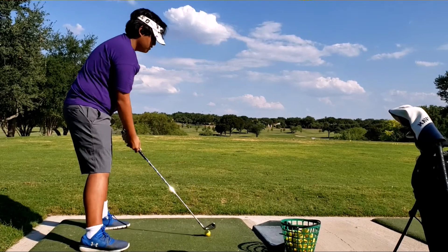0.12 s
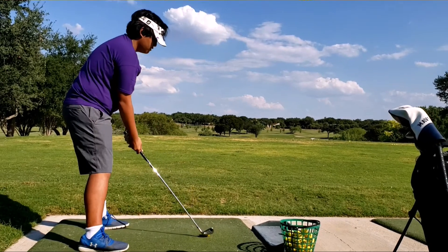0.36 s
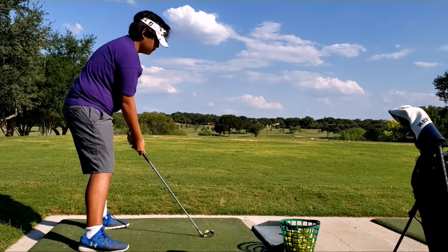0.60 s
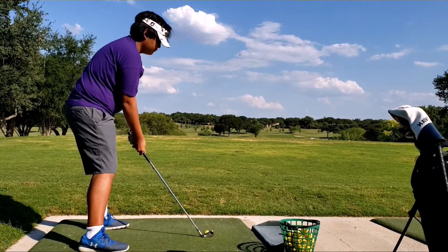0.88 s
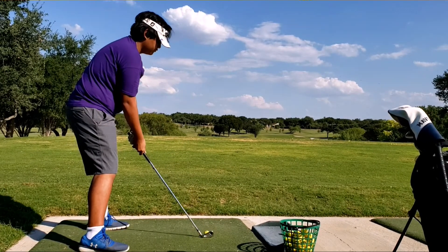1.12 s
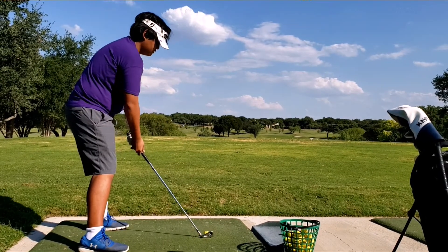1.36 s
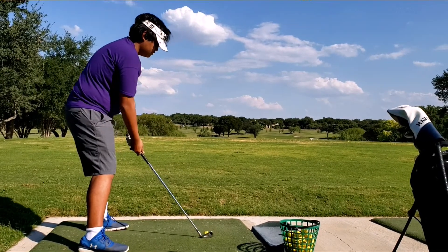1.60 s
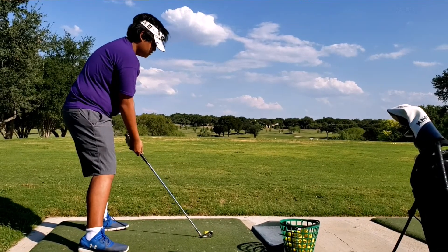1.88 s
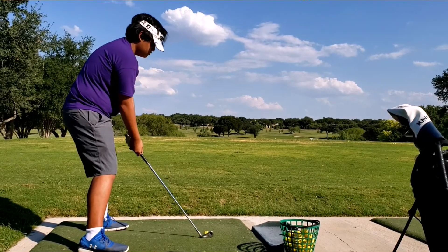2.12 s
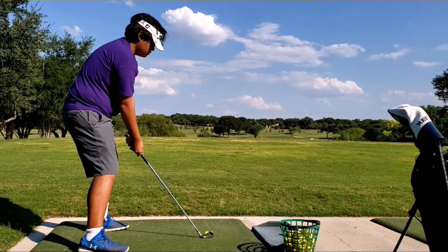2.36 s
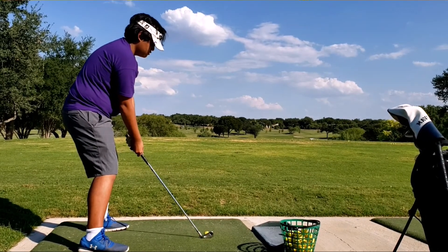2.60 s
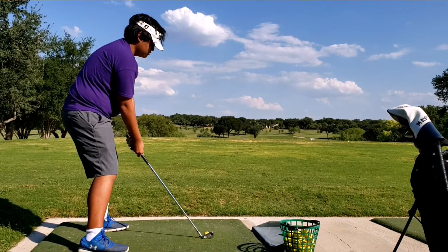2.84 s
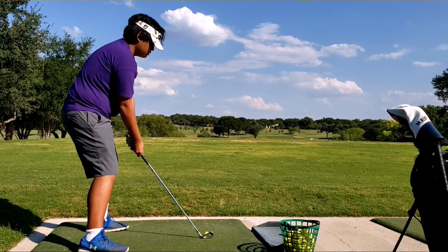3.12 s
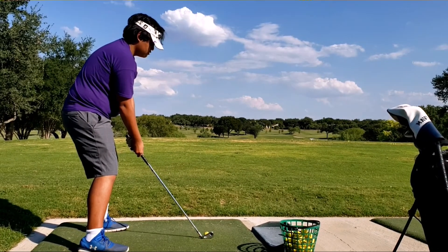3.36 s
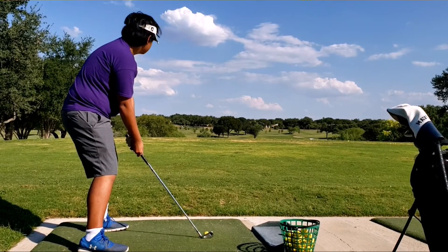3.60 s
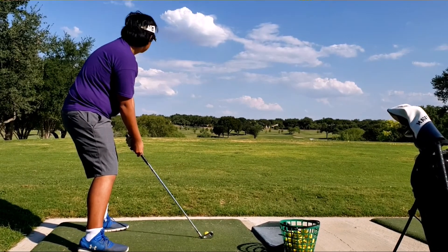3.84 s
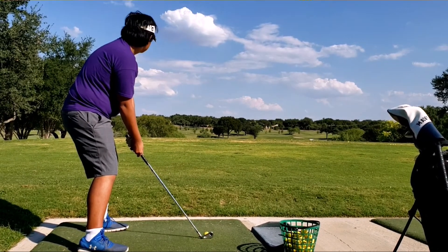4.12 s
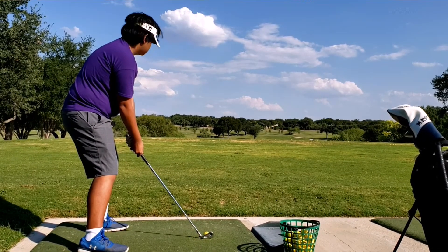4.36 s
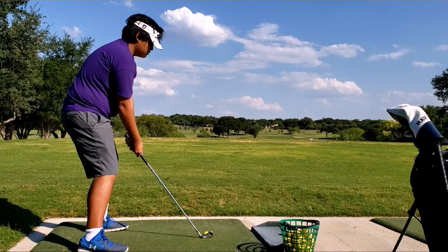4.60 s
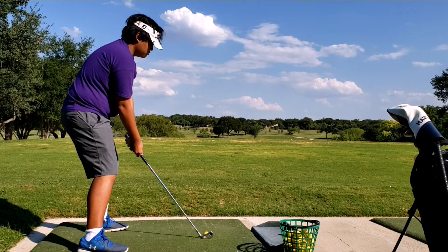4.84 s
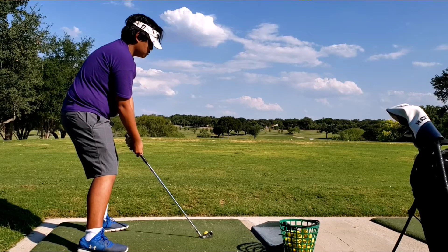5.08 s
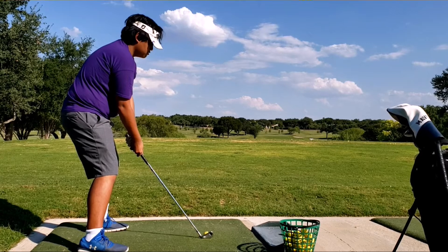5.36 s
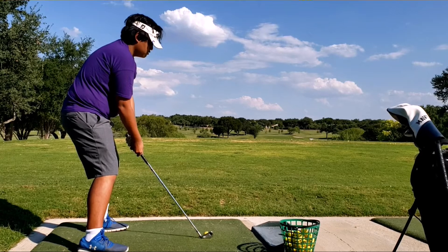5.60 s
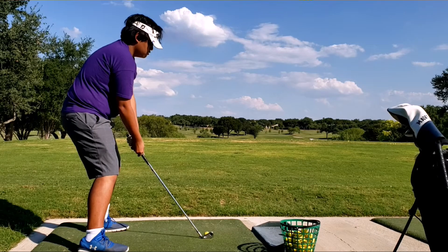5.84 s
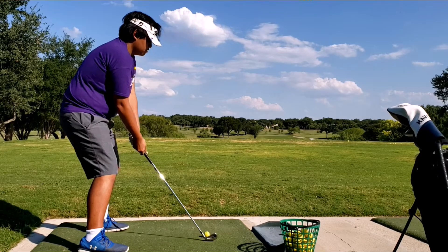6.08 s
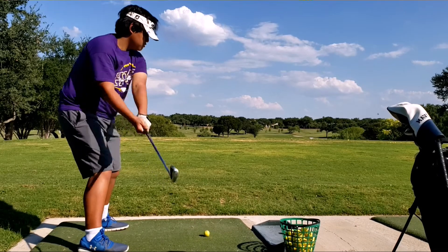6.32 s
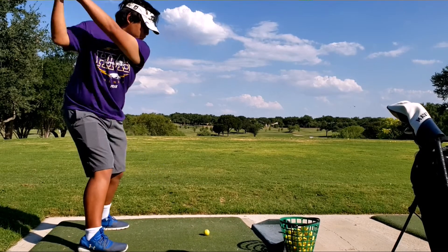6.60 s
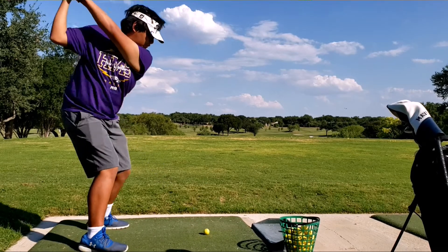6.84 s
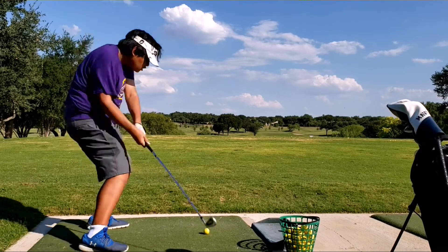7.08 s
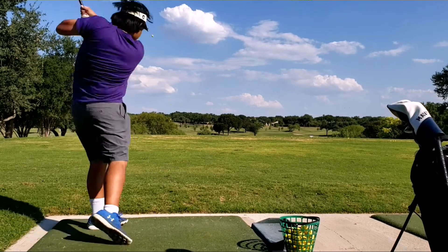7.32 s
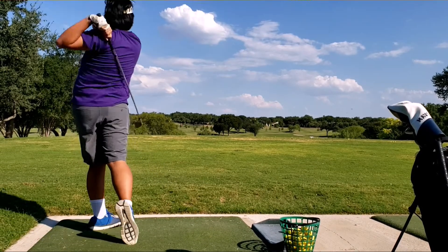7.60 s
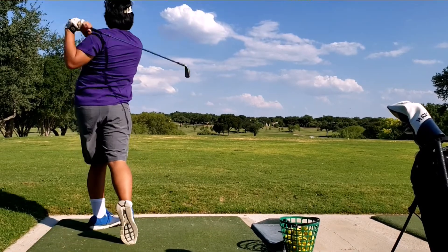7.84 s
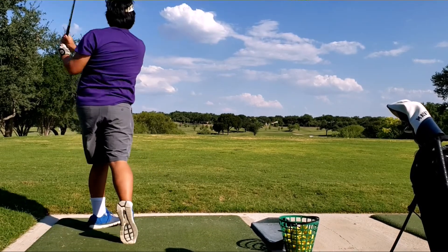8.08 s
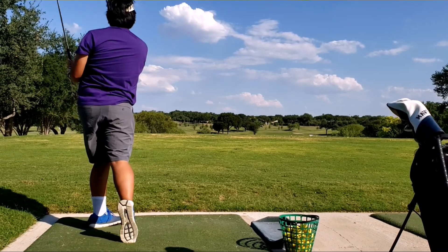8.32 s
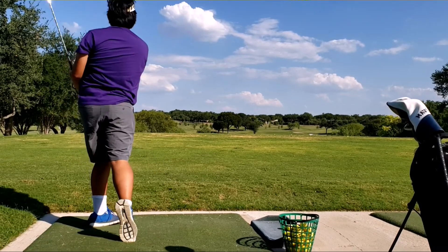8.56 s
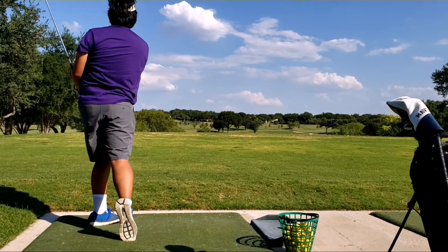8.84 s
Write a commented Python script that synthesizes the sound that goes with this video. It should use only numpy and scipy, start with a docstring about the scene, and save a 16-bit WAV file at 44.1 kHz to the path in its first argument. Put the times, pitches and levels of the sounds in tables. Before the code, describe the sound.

Outdoor range: quiet rumble, thin hiss and tiny metallic knocks; a distant shot echoes, then a close iron swishes and cracks a ball away.

```python
"""A machine drones far off over traffic rumble and thinning hiss; clubs and balls clink, a neighbour hits a shot.
Then cloth rustles, an iron hisses down, grazes a range mat and cracks a ball away near a stereo phone.
Drone and whistle are wandering sines; rumble, hiss, scrape and wake are coloured noise.
Clinks, mat, club face and shaft are decaying modes with noise; a neighbour's crack trails echoes.
A single pop is a jump in the signal."""
import sys
import numpy as np
from scipy import signal
from scipy.fft import rfft, irfft, next_fast_len
from scipy.io import wavfile
from scipy.ndimage import uniform_filter1d

SR = 44100
rng = np.random.default_rng(int(sys.argv[2]) if len(sys.argv) > 2 else 0)


def convert_level_to_amplitude(level_db):
    """Map a level in decibels to its linear amplitude factor."""
    exponent = np.asarray(level_db, float) / 20
    return 10 ** exponent


def generate_wav(signal):
    """Clip the signal to [-1, 1] and save it as 16-bit WAV at the path in sys.argv[1]."""
    frames = np.transpose(np.atleast_2d(signal))
    scaled = np.clip(frames, -1, 1) * 32767
    pcm = np.round(scaled).astype(np.int16)
    wavfile.write(sys.argv[1], SR, pcm)


N = 394694
TIME = np.arange(N) / SR
LEFT_LAG_S = 0.00016  # the far sounds reach the right port first

# port balance of far noise: f/Hz, left minus right/dB
PORTS = [(60, 2), (110, 1.5), (200, 3), (380, 1.5), (700, 9.5), (1290, 6), (2380, 3.5), (4400, 0.5),
         (8120, 11.5), (15000, -5)]
# club contacts (sole on mat twice, face on ball, mat rebounds):
# t/s, level/dB, push width (4 sigma)/ms, face ring re mat thud/dB
BLOWS = [(7.2514, -19.5, 1, -28.5), (7.2531, -20, 0.9, -25), (7.2542, -18.5, 0.086, 20),
         (7.2551, -10.5, 0.055, -17), (7.2581, -12.5, 1, -17), (7.2609, -17, 0.88, -19)]
IMPACT_S = BLOWS[2][0]  # face meets ball


def shape(x, points, lead=((1, 0), (2, 0))):
    """Filter by gain points (f/Hz, dB) and phase points (f/Hz, rad)."""
    size = next_fast_len(x.shape[-1], True)
    hz = np.maximum(np.fft.rfftfreq(size, 1 / SR), 1)
    at, db = np.transpose(points)
    gain = convert_level_to_amplitude(np.interp(np.log(hz), np.log(at), db))
    turn = np.exp(1j * np.interp(hz, *np.transpose(lead)))
    return irfft(rfft(x, size) * gain * turn, size)[..., :x.shape[-1]]


def unit(x):
    """Scale to rms 1."""
    return x / np.sqrt(np.mean(x ** 2))


def band(x, lo_hz, hi_hz, order=2):
    """Butterworth band-pass."""
    sos = signal.butter(order, [lo_hz, hi_hz], "band", fs=SR, output="sos")
    return signal.sosfilt(sos, x)


def fade(t, t60):
    """Silent before 0, then exponential decay, 60 dB in t60 seconds."""
    return (t >= 0) * np.exp(-np.log(1000) * np.maximum(t, 0) / t60)


def walk(rate, size=N):
    """Slow random signal of rms 1: held noise at rate Hz, smoothed twice."""
    k = int(SR / rate)
    held = np.repeat(rng.standard_normal(size // k + 1), k)
    return unit(uniform_filter1d(uniform_filter1d(held, k), k)[:size])


def pan(db):
    """Left and right gains for a left minus right level in dB."""
    return convert_level_to_amplitude(np.array([db / 2, -db / 2]))


def sides(x, points, lead=((1, 0), (2, 0))):
    """Each microphone port colours the sound its own way; the left is also phase-shifted by lead."""
    at, db = np.transpose(points)
    return np.array([shape(x[0], np.c_[at, db / 2], lead), shape(x[1], np.c_[at, -db / 2])])


def add(out, s, x):
    """Mix x into out at s seconds."""
    i = int(round(s * SR))
    out[:, i:i + x.shape[1]] += x[:, :N - i]


def modes(t, table):
    """Sum of decaying sines (f/Hz, level/dB, t60/s)."""
    return sum(convert_level_to_amplitude(db) * fade(t, t60) * np.sin(2 * np.pi * hz * t) for hz, db, t60 in table)


def patchy(x, db, rate):
    """Third-octave bands flicker independently by db rms at rate Hz."""
    size = x.shape[-1]
    spec = rfft(x)
    at = 3 * np.log2(np.maximum(np.fft.rfftfreq(size, 1 / SR), 350) / 350)
    out = 0
    for k in range(19):
        part = irfft(spec * np.maximum(1 - abs(at - k), 0), size)
        out = out + part * convert_level_to_amplitude(db * walk(rate, size=size))
    return out


def drone():
    """A steady far machine: one strong low tone whose partials waver on the wind."""
    # fundamental: t/s, level/dB
    drone_level = [(0.0, -34), (0.05, -35.5), (1.32, -36), (1.62, -44.5), (3.69, -34.5), (4.01, -38.5),
                   (4.29, -32), (4.59, -36.5), (4.69, -44.5), (5.06, -33), (5.63, -39), (5.71, -47),
                   (6.33, -39.5), (6.86, -44), (6.9, -53.5), (7.3, -35.5), (7.85, -50), (8.2, -32.5),
                   (8.45, -39.5), (8.95, -37)]
    # other partials: multiple of the pitch, level/dB, waver/dB
    partials = [(0.616, -64.5, 2.5), (1.251, -47, 2), (2.017, -50.5, 2), (3.022, -57, 5.5), (3.998, -58, 4),
                (5.064, -64, 5), (10.37, -69, 3), (23.77, -90, 4), (23.9, -88.5, 4)]
    pitch_hz, pitch_stray_hz = 57.3, 0.297
    partial_stray_rad = 0.06  # per multiple: high partials blur
    phase = 2 * np.pi * np.cumsum(pitch_hz + pitch_stray_hz * walk(2)) / SR
    out = convert_level_to_amplitude(np.interp(TIME, *np.transpose(drone_level)) + 1.5 * walk(7)) * np.sin(phase)
    for k, order_db, waver_db in partials:
        strayed = phase + partial_stray_rad * walk(60)
        tone = np.sin(k * strayed + 2 * np.pi * rng.random())
        out = out + convert_level_to_amplitude(order_db + waver_db * walk(8)) * tone
    late = np.roll(out, int(LEFT_LAG_S * SR))
    return np.sqrt(2) * np.array([late, out]) * pan(2.3)[:, None]


def background():
    """Noise: traffic rumble alike in both ports, roar less so; hiss that slowly thins below 8 kHz."""
    # likeness of the ports: f/Hz, likeness -1..1 (clipped)
    likeness = [(60, 0.9), (130, 1), (290, 0.9), (640, 0.65), (1410, -0.23), (3100, -1.3), (6820, 0.19),
                (15000, 0.24)]
    # traffic before the offsets below: t/s, low rumble/dB, roar/dB
    traffic = [(0, -42, -58), (1.9, -45, -57.5), (4.3, -43, -58.5), (7.2, -44, -57), (7.8, -45, -59.5),
               (8.95, -44.5, -60)]
    # traffic colour: f/Hz, relative gain/dB
    rumble_colour = [(15, -65.5), (25, -33), (29, -20.5), (36, -16.5), (63, -7), (87, -5), (123, -8),
                     (175, -11), (195, -14), (281, -17), (384, -30), (413, -29), (596, -32), (1130, -49),
                     (2000, -65), (2600, -92), (4400, -120)]
    # hiss colour: f/Hz, relative gain/dB
    hiss_colour = [(880, -33), (1500, 2), (1830, -3), (2280, -3), (2460, -4), (2760, -2.5), (3130, -7.5),
                   (4210, -8), (4900, -8), (6650, -11.5), (8610, -30), (9470, -22), (10700, -12.5),
                   (13900, -11.5), (14700, -17.5)]
    # hiss below about 8 kHz: t/s, level/dB
    low_hiss_level = [(0, -76.5), (3, -79.5), (6.4, -79.5), (6.9, -80.5), (7.8, -82.5), (8.95, -84)]
    top_hiss_db = -75.5
    at, alike = np.transpose(likeness)
    alike = np.clip(alike, -.999, .999)
    mid = shape(rng.standard_normal(N), np.c_[at, 10 * np.log10(1 + alike)])
    side = shape(rng.standard_normal(N), np.c_[at, 10 * np.log10(1 - alike)])
    lag = [(0, 0), (SR / 2, -np.pi * SR * LEFT_LAG_S)]
    far_noise = shape(sides(np.array([mid + side, mid - side]), PORTS, lag), rumble_colour)
    low = shape(far_noise, [(330, 0), (420, -62.5)])
    roar = far_noise - low
    hiss = shape(sides(rng.standard_normal((2, N)), PORTS), hiss_colour)
    low_hiss = shape(hiss, [(7000, -1.5), (9500, -61.0)])
    s, low_db, roar_db = np.transpose(traffic)
    low_gain = convert_level_to_amplitude(np.interp(TIME, s, low_db) + 4.0 + 1.0 * walk(6))
    roar_gain = convert_level_to_amplitude(np.interp(TIME, s, roar_db) + 1.5 + 1.7 * walk(6))
    waver_db = 1.0 * np.array([walk(9.6), walk(13)])
    low_hiss_gain = convert_level_to_amplitude(np.interp(TIME, *np.transpose(low_hiss_level)) + waver_db)
    top_hiss_gain = convert_level_to_amplitude(top_hiss_db + 1.1 * walk(34))
    return (low_gain * unit(low) + roar_gain * unit(roar)
            + low_hiss_gain * unit(low_hiss) + top_hiss_gain * unit(hiss - low_hiss))


def thud_and_ring(t):
    """Modes of the mat, and of club face and ball; the ball flattens before it springs."""
    # mat: f/Hz, level/dB, t60/s
    mat_modes = [(110, -24, .03), (319.2, -19.5, 0.0087), (390, -17.5, 0.018), (640, -3.5, 0.018),
                 (770, -4, 0.016), (980, -22, 0.021), (1480, -8.5, 0.021), (1680, -10, 0.013),
                 (1950, -2.5, 0.011), (2580, -19, .02)]
    # club face and ball: f/Hz, level/dB, t60/s
    face_modes = [(3180, -21, 0.009), (4378, 3, 0.0037), (4650, -3.5, 0.0053), (4830, -26, 0.038),
                  (7500, -11.5, 0.0067), (9400, -12.5, 0.0085), (10970, -12, 0.0036), (13490, -9, 0.0045)]
    face_rise_s = 0.0005
    return modes(t, mat_modes), modes(t, face_modes) * (1 - np.exp(-t / face_rise_s))


def set_down():
    """The club is set down: mat and face modes, cut short."""
    # taps: t/s, level/dB, left minus right/dB
    tap_list = [(0.225, -52.5, -14), (0.2417, -50.5, -23)]
    t, out = TIME[:SR // 4], np.zeros((2, N))
    thud, ring = thud_and_ring(t)
    for s, db, pan_db in tap_list:
        add(out, s, convert_level_to_amplitude(db) * pan(pan_db)[:, None] * (thud + convert_level_to_amplitude(-6) * ring) * fade(t, 0.011))
    return out


def clinks():
    """Balls, club heads and shafts knock along the range: click, rough rings, tick and scattered tail."""
    # knocks (the first as the club is set down on the mat): t/s, level/dB, t60/s, left minus right/dB, top
    # hiss/dB, rings (f/Hz, level/dB)
    clink_list = [(0.2415, -55.5, 0.013, -18.5, -25, [(1000, 4.5), (1700, 0), (2780, -13), (4400, -11),
                  (5900, -11)]), (0.4515, -62.5, 0.056, 9, -25, [(3320, -1.5), (4020, -4), (4985, -5),
                  (6020, -2.5)]), (0.4655, -57.5, 0.093, 7, -16, [(2470, -10), (4995, -9), (6020, -9)]),
                  (1.1455, -54, 0.04, -1, -15, [(5250, -10), (5740, 0.5), (6385, -13)]),
                  (1.19, -50, 0.081, 10, -23, [(2300, -21), (4005, -15), (5790, -1.5), (6300, -10)]),
                  (1.2072, -57.5, 0.083, -8, -14, [(3920, -13), (5395, -1), (5975, -9)]),
                  (1.4921, -47, 0.029, 7, -23, [(1700, -17), (3300, -18), (3680, 0), (4565, -4),
                  (6570, -1.5), (7770, -8)]), (1.507, -63, .06, 9.5, -30, [(3110, -2), (7780, 0)]),
                  (1.892, -63, 0.16, 13.5, -28, [(3230, -2.5), (5100, -11)]),
                  (2.3615, -57.5, .14, 3, -12, [(3220, -10), (4040, -12), (5480, -2.5), (6060, -17)]),
                  (2.932, -74.5, 0.12, 10, -16, [(2350, -2.5), (3970, -4), (6840, -3)]),
                  (4.2892, -56.5, 0.052, 4, -9.5, [(4150, -5.5), (5870, 0), (10200, -4), (10900, -10)]),
                  (4.613, -63, 0.03, 10.5, -2, [(2900, -6), (3670, -3), (5480, -4), (6320, -1),
                  (7500, -7)]), (4.6405, -62.5, 0.05, -9, -1, [(2600, -10), (4340, -0.5), (5530, -7),
                  (6050, -8)]), (4.6785, -56.5, 0.025, 11, -3, [(3710, -5), (5440, -3), (6590, -5),
                  (7190, -5), (9055, -1)]), (4.728, -60.5, 0.31, -11.5, -7.5, [(2260, 2), (4110, -7),
                  (5040, -1)]), (4.8205, -55.5, 0.051, 4, -8.5, [(1790, -7), (2470, 3), (3550, -13),
                  (5020, 1.5), (5800, -7), (7000, -13), (13500, -18)]),
                  (5.227, -68, 0.27, 1, -22, [(2420, -4.5), (4040, -1)]),
                  (5.24, -71, 0.21, -8, -30, [(1905, 0), (5190, -4.5)]),
                  (5.805, -75.5, 0.27, -13, -18, [(1700, -4), (5580, -0.5), (9800, -10.5)]),
                  (6.2686, -52.5, 0.042, 2, -28, [(2230, -7), (3220, -13), (4340, -5), (5135, -2),
                  (6430, -13), (7100, -14)]), (6.4365, -66, 0.084, -10, -21, [(4300, -7), (5050, -1),
                  (7130, -11)]), (8.469, -76.5, 0.013, 2, 0, [(5100, -1.5)])]
    ring_rough_db, ring_wander_rad = 2, 0.81
    click_db, click_t60_s = -2.5, 0.004
    tick_db, tick_t60_s = -4.5, 0.015
    tail_db, tail_t60_s = -7.5, 0.33
    tail_per_top = 0.4  # hissier clinks scatter more
    out, t = np.zeros((2, N)), TIME[:SR // 2]
    size = len(t)
    for s, db, t60, pan_db, top_db, tones in clink_list:
        noise = rng.standard_normal((2, size))
        noise = noise + 0.068 * noise[::-1]
        rings, broad = 0, 0
        for hz, ring_db in tones:
            gain = convert_level_to_amplitude(ring_db + ring_rough_db * walk(300, size=size)) * fade(t, t60)
            stray = ring_wander_rad * walk(400, size=size)
            rings = rings + gain * np.sin(2 * np.pi * hz * t + stray)
            broad = broad + convert_level_to_amplitude(ring_db) * unit(band(noise, 0.85 * hz, 1.155 * hz))
        top = convert_level_to_amplitude(top_db) * unit(band(noise, 9000, 14500, order=3))
        tick = broad * convert_level_to_amplitude(tick_db) * fade(t, tick_t60_s) + top * fade(t, t60)
        tail = (broad + top) * convert_level_to_amplitude(tail_db + tail_per_top * top_db) * fade(t, tail_t60_s)
        click = unit(band(noise, .8 * tones[0][0], 1.15 * tones[-1][0]))
        click = convert_level_to_amplitude(click_db) * click * fade(t, click_t60_s)
        knock = rings + click + patchy(tick + tail, db=2.5, rate=150)
        add(out, s, convert_level_to_amplitude(db) * pan(pan_db)[:, None] * np.minimum(t / 0.00032, 1) * knock)
    return out


def pop():
    """The signal builds one way, jumps across zero and relaxes."""
    at_s, jump_db, fall_s = 0.31232, -23.5, 0.0064
    t = TIME - at_s
    return convert_level_to_amplitude(jump_db) / 2 * np.where(t >= 0, 1, -1) * np.exp(-np.abs(t) / fall_s)


def squeaks():
    """Thin gliding tones; one wobble moves pitch and level together."""
    # squeaks: start/s, length/s, start f/Hz, end f/Hz, level/dB
    squeak_list = [(2.055, 0.1, 11300, 11300, -74), (2.103, .012, 5270, 5000, -72),
                   (2.155, 0.022, 5000, 5200, -71), (2.179, .016, 5300, 4760, -65),
                   (2.215, 0.07, 11500, 11400, -75), (2.21, .07, 7100, 7300, -78)]
    out = np.zeros((2, N))
    for s, length, from_hz, to_hz, db in squeak_list:
        u = np.clip((TIME - s) / length, 0, 1)
        wobble = walk(500)
        hz = from_hz + (to_hz - from_hz) * u + 170 * wobble
        out += convert_level_to_amplitude(db + 3.3 * wobble) * np.sin(np.pi * u) * np.sin(2 * np.pi * np.cumsum(hz) / SR)
    return out


def neighbour():
    """A shot some bays away: smeared crack, then echoes off near and far trees with two faint rings."""
    # shot: t/s, level before an 11.5 dB cut/dB, t60/s, echo/dB, echo t60/s
    shot_list = [(2.4775, -31.5, 0.082, -6, 0.68)]
    # colour: f/Hz, relative gain/dB
    shot_colour = [(410, -33), (700, -5), (882, -12), (977, -8), (1180, -11), (2140, -2), (3260, -14),
                   (3710, -5), (5310, 1.5), (7510, -8), (14100, -4), (15000, -21)]
    # clang, narrow noise bands: f/Hz, level/dB, t60/s
    clang_bands = [(3200, -21, 0.037), (5100, -6, .06), (5510, -6, .05), (6400, 6, 0.069),
                   (7800, -6, 0.043), (11800, -1, .03)]
    s, db, t60, echo_db, echo_t60 = shot_list[0]
    t, out = TIME[:SR], np.zeros((2, N))
    white = rng.standard_normal((2, len(t)))
    noise = patchy(unit(sides(shape(white, shot_colour), PORTS)), db=3.0, rate=111.4)
    clang = 0
    for hz, ring_db, ring_t60 in clang_bands:
        clang = clang + convert_level_to_amplitude(ring_db) * fade(t, ring_t60) * unit(band(white, .97 * hz, 1.03 * hz))
    rings = .5 * unit(band(white, 3210, 3290, order=1))
    rings = rings + 0.24 * unit(band(white, 6410, 6510, order=1))
    # near trees answer at 56 ms, far ones at 155 ms
    echo = noise * (1 + 0.59 * fade(t - .056, 0.1) + 0.5 * fade(t - .155, 0.36))
    echo = echo + rings * (.5 + fade(t - .155, 0.77))
    echo = echo * convert_level_to_amplitude(echo_db) * fade(t, echo_t60)
    crack = (noise + 0.5 * rings) * fade(t, t60)
    add(out, s, convert_level_to_amplitude(db - 11.5) * np.minimum(t / .0015, 1) * (crack + 0.54 * clang + echo))
    return out


def shaft():
    """A knocked steel shaft rings in a bag, chattering against its neighbours, then is damped."""
    # shaft: f/Hz, level/dB, t60/s
    shaft_modes = [(2280, -10, 0.23), (2400, -16, 0.29), (2650, -12, 0.35), (3580, -4, 0.99),
                   (3000, -25, 0.24), (4050, -21, .2), (4600, -16, .25), (5000, -25, .28),
                   (5500, -19, 0.19), (9500, -9, 0.2), (9750, -15, .2), (10200, -14, .2), (10800, -20, .08)]
    # knocks: t/s, level/dB, rings freely for/s, left minus right/dB
    knock_list = [(4.7273, -54, 0.098, 17)]
    rough_db_s = 0.5  # chatter/dB times t60/s: long rings stay clean
    t, out = TIME[:SR // 2], np.zeros((2, N))
    size = len(t)
    for s, db, held, pan_db in knock_list:
        rattle = 0
        for mode in shaft_modes:
            chatter = np.array([walk(235, size=size), walk(230, size=size)])
            rattle = rattle + modes(t, [mode]) * convert_level_to_amplitude(rough_db_s / mode[2] * chatter)
        noise = unit(band(rng.standard_normal((2, size)), 1300, 5600))
        rattle = rattle + convert_level_to_amplitude(-12) * fade(t, 0.74) * noise * convert_level_to_amplitude(2.5 * walk(150, size=size))
        damped = .7 * fade(t - held, 0.031) + .15 * fade(t - held, .2)
        add(out, s, convert_level_to_amplitude(db) * pan(pan_db)[:, None] * rattle * ((t < held) + damped))
    return out


def rustle():
    """Cloth rustles through the backswing: a broad scrape with a few flickering bands."""
    # cloth: centre f/Hz, width/Hz, level/dB
    cloth_bands = [(3200, 400, -9), (4300, 400, -7), (5040, 250, -2), (5500, 300, -5), (6360, 250, -4),
                   (7180, 350, -4), (5200, 5500, 2), (12000, 4000, -8)]
    start_s, t60_s, level_db = (6.258, 1.0, -67)  # start/s, t60/s, level/dB
    t, out = TIME[:SR // 2], np.zeros((2, N))
    noise = rng.standard_normal((2, len(t)))
    cloth = 0
    for hz, width, band_db in cloth_bands:
        flicker = convert_level_to_amplitude(band_db + 2.5 * walk(90, size=len(t)))
        cloth = cloth + flicker * unit(band(noise, hz - width / 2, hz + width / 2))
    envelope = np.minimum(t / .015, 1) * fade(t, t60_s) * (1 - 2 * t)
    add(out, start_s, convert_level_to_amplitude(level_db) * envelope * unit(cloth))
    return out


def downswing():
    """Air noise and a rising whistle grow as the shaft speeds down, then fade from impact."""
    # air noise: t/s, level/dB
    swing_level = [(7.14, -81), (7.19, -57), (7.205, -51.5), (7.225, -43.5), (7.248, -44), (7.252, -28.5)]
    # air colour: f/Hz, relative gain/dB
    swish_colour = [(290, -34), (500, -1.5), (800, -6), (1350, -12.5), (1800, -17.5), (2130, -12.5),
                    (3270, -24.5), (3880, -16), (6760, -26.5), (11100, -26), (15000, -33.5)]
    # port balance: f/Hz, left minus right/dB
    swish_ports = [(300, 5), (1500, 0.5), (4400, -3.5), (8000, 10), (15000, 10.5)]
    # the shaft's air tone rises with speed: t/s, f/Hz, level/dB
    whistle_track = [(7.18, 900, -66), (7.205, 1480, -57), (7.225, 2160, -51), (7.25, 2300, -58)]
    treble_power = 1.5  # the top grows as this power of the level
    start_s = 7.0
    t, out = TIME[:SR] + start_s, np.zeros((2, N))
    s, db = np.transpose(swing_level)
    noise = rng.standard_normal((2, SR))
    air = unit(sides(shape(noise + 0.4 * noise[::-1], swish_colour), swish_ports))
    air = patchy(air, db=3.5, rate=130)
    low = shape(air, [(5500, -0.5), (7000, -41.5)])
    level_db = np.interp(t, s, db, left=-120)
    down = low * convert_level_to_amplitude(level_db) + (air - low) * convert_level_to_amplitude(db[3] + treble_power * (level_db - db[3]))
    s, hz, db = np.transpose(whistle_track)
    tone_hz = np.interp(t, s, hz) + 220 * walk(500, size=SR)
    tone = np.sin(2 * np.pi * np.cumsum(tone_hz) / SR) * convert_level_to_amplitude(3.0 * walk(300, size=SR))
    down = down + tone * convert_level_to_amplitude(np.interp(t, s, db, left=-120)) * pan(-2.5)[:, None]
    add(out, start_s, down * ((t < IMPACT_S) + fade(t - IMPACT_S, 0.082)))
    return out


def strike():
    """Each contact pushes the mat into a thud and the club face into a ring; turf scrapes behind."""
    # f/Hz, gain/dB; the mat's mirror thins 5 kHz
    strike_colour = [(350, 0), (480, -7), (700, 0), (1200, -4), (1500, 0), (2000, 1.5), (2300, -3.5),
                     (3200, 0.5), (4900, -2), (5250, -8), (6000, -3.5), (7500, -3.5), (9600, 0),
                     (13000, 1.5), (15000, 0)]
    # port balance: f/Hz, left minus right/dB
    strike_ports = [(60, -0.5), (300, 4), (620, 1), (1000, 1), (1350, 5), (1650, -6), (2000, 4.5),
                    (2500, -2), (3100, -2), (3800, 1), (4350, -2), (4850, -8), (5500, -5.5), (6500, 6.5),
                    (7500, 11), (8500, 11), (9700, 2), (11200, 16.5), (13000, 12.5), (15000, 9)]
    # f/Hz, left lead/rad
    strike_lead = [(0, 0), (300, -.15), (700, .2), (1100, -.3), (1500, -.9), (2000, .9), (2500, -1.2),
                   (3100, 0), (4400, -.4), (5500, 1.2), (7500, 0), (9700, -1.3), (15000, -.6)]
    # scrape colour: f/Hz, gain/dB
    turf_colour = [(700, -3), (1400, -0.5), (2500, 1), (3500, -0.5), (4800, -2), (5300, -8), (6900, -9),
                   (7600, -4), (8900, -10), (9600, 1.5), (11000, -3), (15000, -5)]
    # scrape port balance: f/Hz, left minus right/dB
    turf_ports = [(700, 4.5), (1400, 4), (2300, -0.5), (3300, 9.5), (4700, -3), (6500, 6.5), (8500, 10.5),
                  (15000, 10)]
    scrape_db, scrape_t60_s, scatter_db = -28, 0.046, 6.5
    graze_s, graze_db = 7.2515, -18  # the sole brushes the turf before the ball; dB re scrape
    start_s = 7.24
    t, out = TIME[:SR // 4], np.zeros((2, N))
    thud, ring = thud_and_ring(t)
    hit = 0
    for s, db, push_ms, face_db in BLOWS:
        push = np.exp(-.5 * ((t - s + start_s) / (push_ms / 4000)) ** 2)
        body = thud + convert_level_to_amplitude(face_db) * ring
        hit = hit + convert_level_to_amplitude(db) * signal.fftconvolve(push / push.sum(), body)[:len(t)]
    after = t - IMPACT_S + start_s
    grit = rng.standard_normal((2, len(t)))
    crack = band(grit + grit[::-1], 7000, 14500) * fade(after - .0003, .006)
    graze = convert_level_to_amplitude(graze_db) * fade(t - graze_s + start_s, 0.022)
    scrape = patchy(band(grit, 700, 16000, order=1), db=scatter_db, rate=300)
    scrape = scrape * (fade(after, scrape_t60_s) + graze) + 7.1 * crack
    contact = shape(band([hit, hit], 70, .49 * SR), strike_colour)
    contact = sides(contact, strike_ports, strike_lead)
    add(out, start_s, contact + convert_level_to_amplitude(scrape_db) * sides(shape(scrape, turf_colour), turf_ports))
    return out


def wake():
    """Air torn by club and ball: noise swells and dies; the mids' balance turns from left-heavy to right-heavy."""
    # wake: t/s, mid/dB, treble/dB
    wake_level = [(7.275, -52, -53), (7.305, -57, -61.5), (7.322, -49.5, -54.5), (7.377, -56, -56),
                  (7.45, -69, -68.5), (7.58, -78, -71.5), (7.62, -77, -75.5), (7.68, -86, -90)]
    # colour: f/Hz, relative gain/dB
    wake_colour = [(590, -29.5), (1000, 3), (1470, -11), (1670, -7), (2500, -4.5), (3290, -36),
                   (3600, -12.5), (4310, -2.5), (5470, -1), (6560, -14), (10800, -10), (14500, -14.5),
                   (15000, -26)]
    tilt_s, tilt_width_s = 7.345, 0.02
    from_db, to_db, treble_pan_db = 9, -8, 11  # left minus right
    start_s = 7.0
    t, out = TIME[:SR] + start_s, np.zeros((2, N))
    s, mid_db, treble_db = np.transpose(wake_level)
    torn = patchy(shape(rng.standard_normal((2, SR)), wake_colour), db=2.0, rate=110)
    mid = shape(torn, [(6200, 2.0), (6800, -52.5)])
    mid_pan_db = from_db + (to_db - from_db) * (1 + np.tanh((t - tilt_s) / tilt_width_s)) / 2
    still_db = np.full(SR, treble_pan_db)
    for part, db, pan_db in ((mid, mid_db, mid_pan_db), (torn - mid, treble_db, still_db)):
        gain = convert_level_to_amplitude(np.interp(t, s, db, right=-120)) * (t > IMPACT_S)
        add(out, start_s, unit(part) * gain * pan(pan_db))
    return out


def scene():
    """Sum of all acoustic sources."""
    far = drone() + background() + clinks() + squeaks() + neighbour() + shaft()
    return far + set_down() + rustle() + downswing() + strike() + wake()


def roll_off(x):
    """The treble ends steeply here."""
    return signal.sosfilt(signal.butter(12, 16030, fs=SR, output="sos"), x)


def record(dry):
    """Adds the pop; a gentle dip near 8.5 kHz, and the top is cut."""
    response = [(40, -2), (55, 0), (7000, -0.5), (8500, -3.5), (10000, -1.5),
                (14500, -2.0), (14800, -25.0), (16000, -30.5)]  # f/Hz, gain/dB
    mix = shape(dry + pop(), response)
    return roll_off(mix)


dry = scene()
out = record(dry)
generate_wav(out)
```